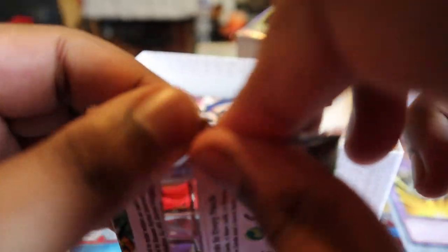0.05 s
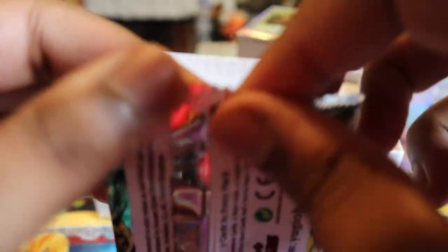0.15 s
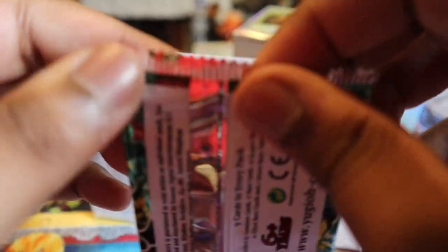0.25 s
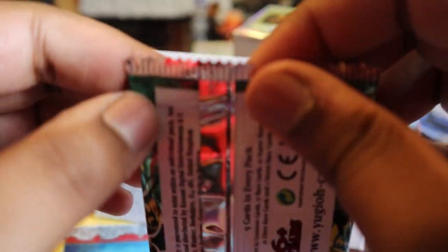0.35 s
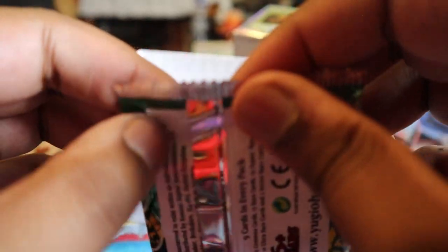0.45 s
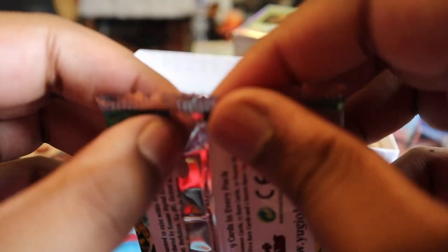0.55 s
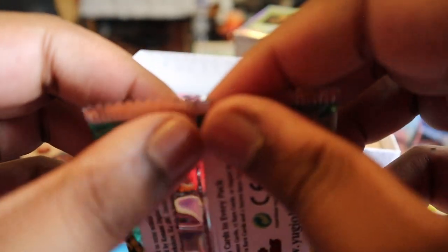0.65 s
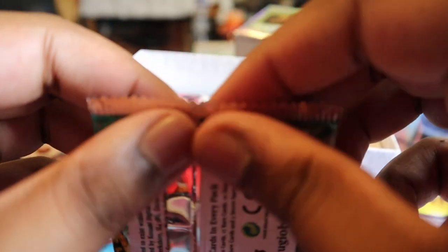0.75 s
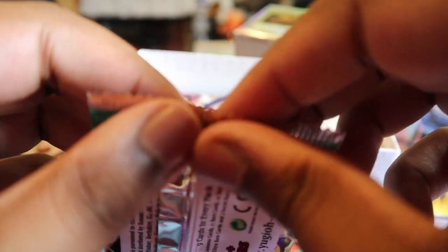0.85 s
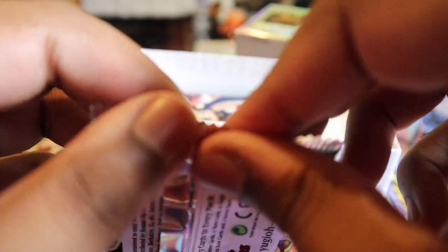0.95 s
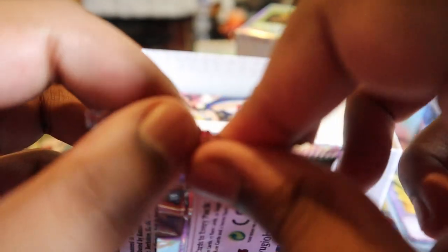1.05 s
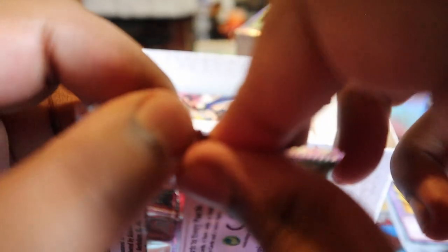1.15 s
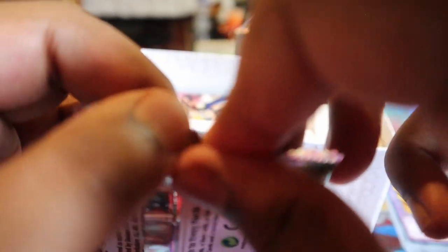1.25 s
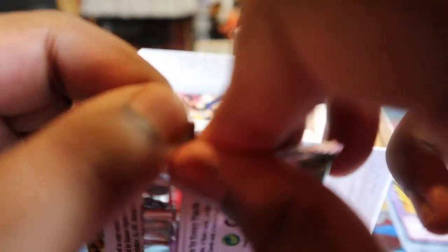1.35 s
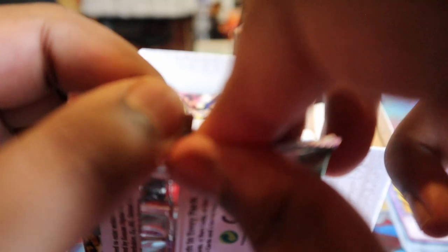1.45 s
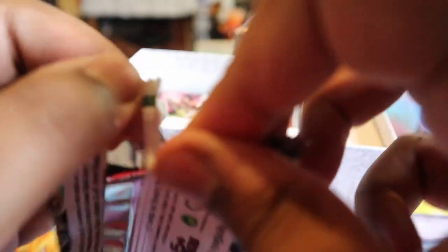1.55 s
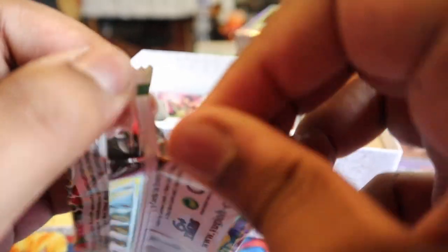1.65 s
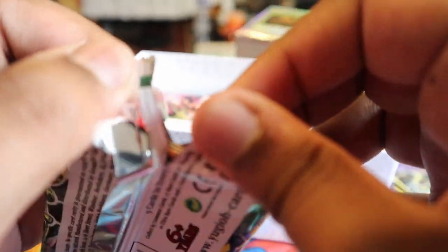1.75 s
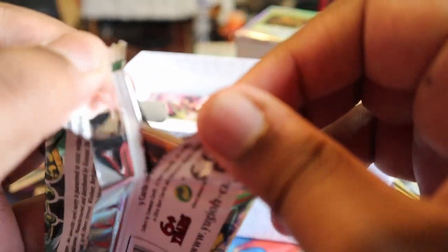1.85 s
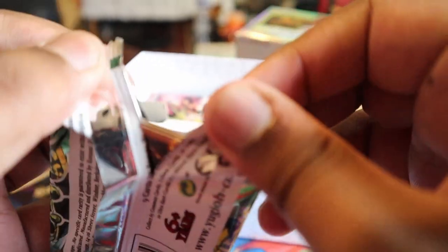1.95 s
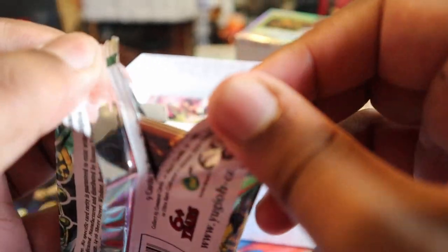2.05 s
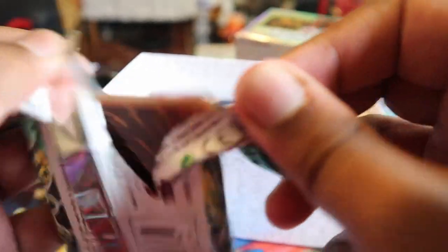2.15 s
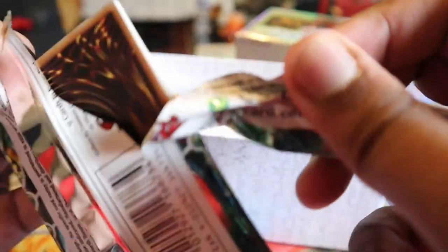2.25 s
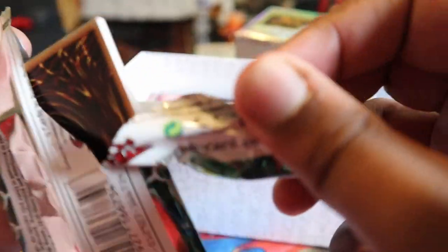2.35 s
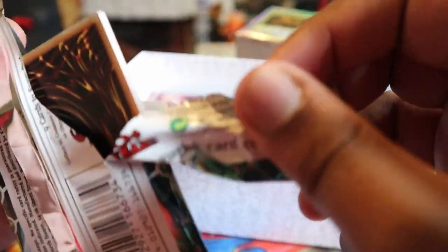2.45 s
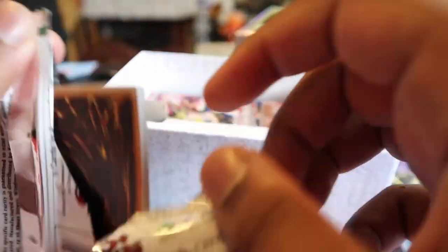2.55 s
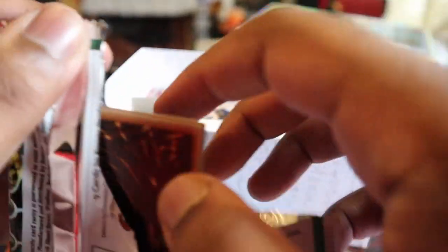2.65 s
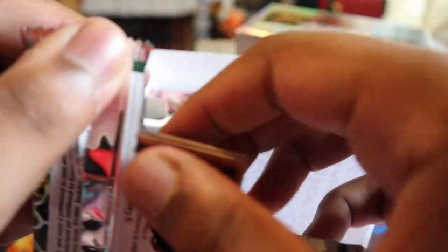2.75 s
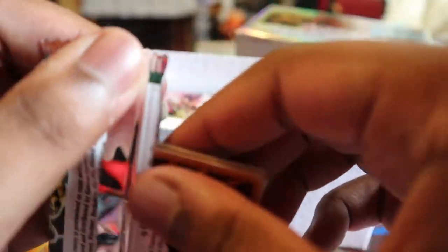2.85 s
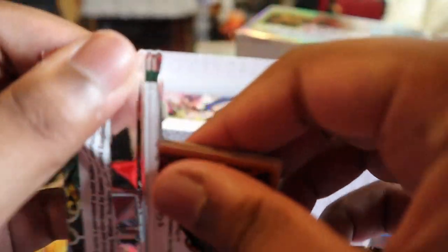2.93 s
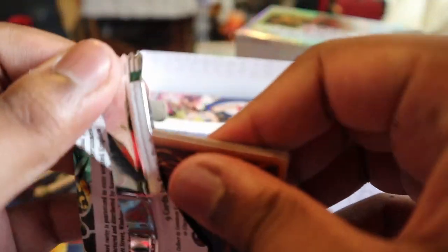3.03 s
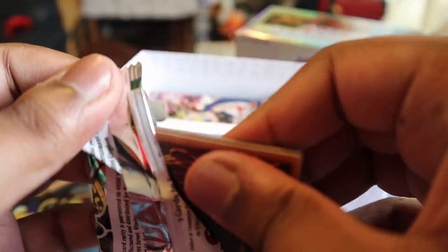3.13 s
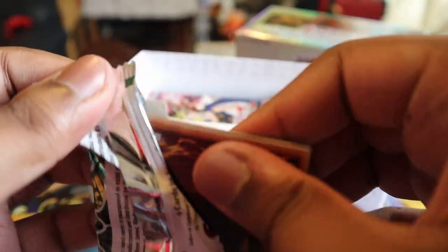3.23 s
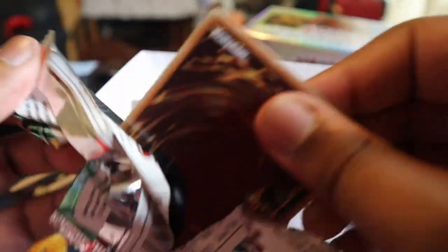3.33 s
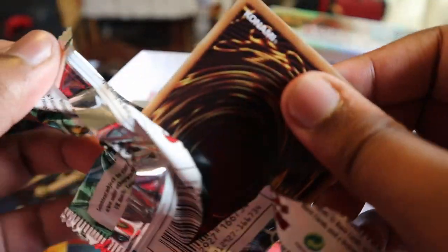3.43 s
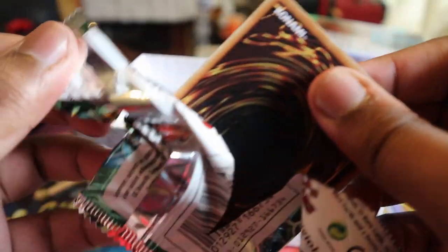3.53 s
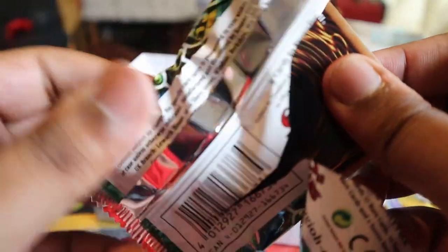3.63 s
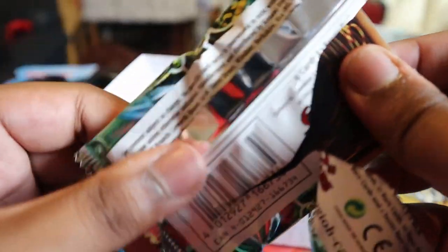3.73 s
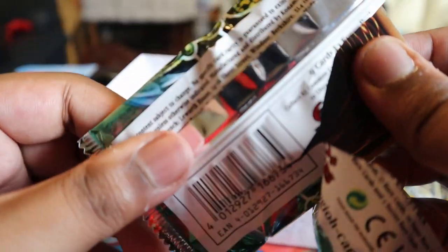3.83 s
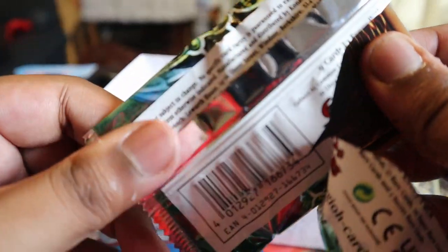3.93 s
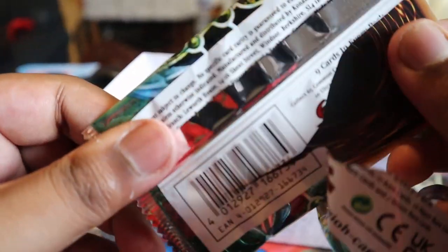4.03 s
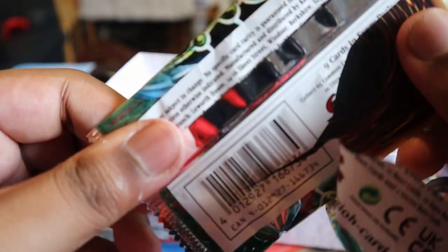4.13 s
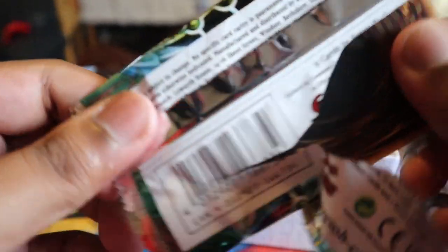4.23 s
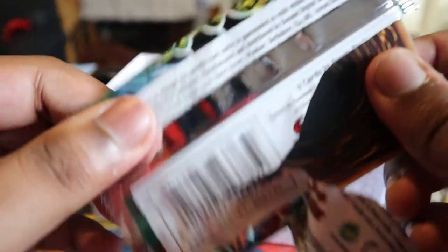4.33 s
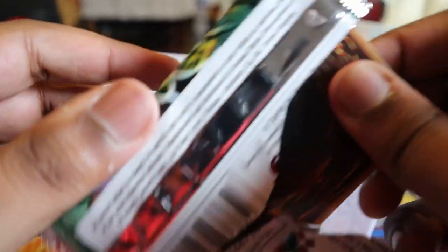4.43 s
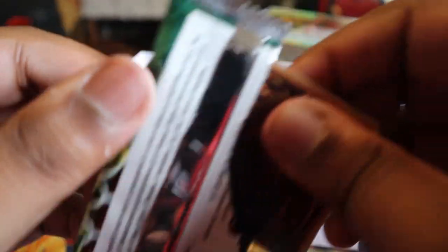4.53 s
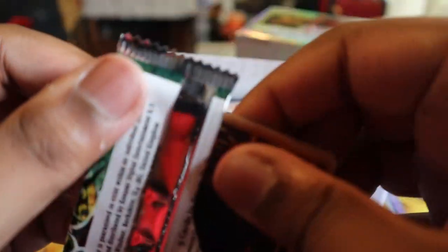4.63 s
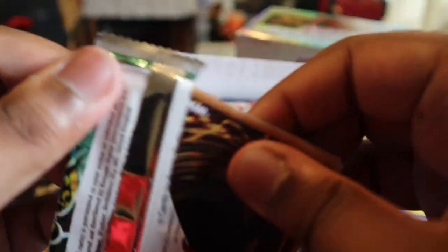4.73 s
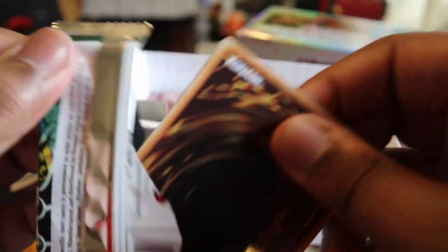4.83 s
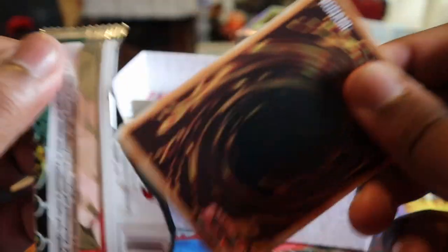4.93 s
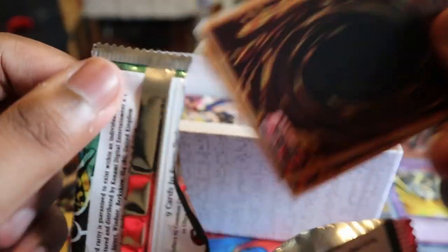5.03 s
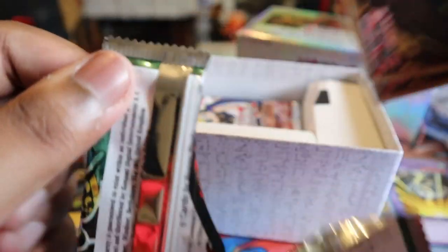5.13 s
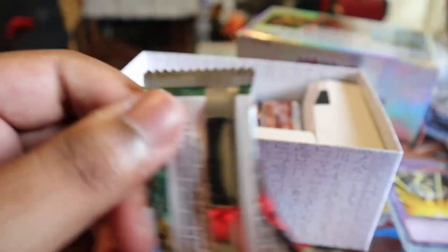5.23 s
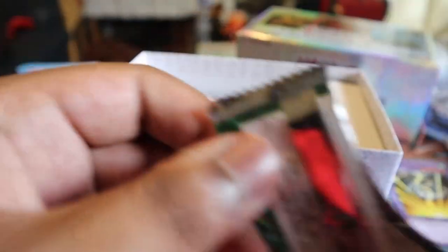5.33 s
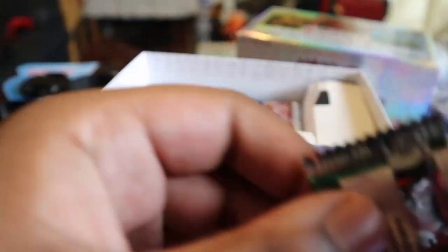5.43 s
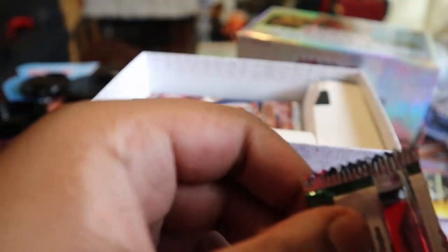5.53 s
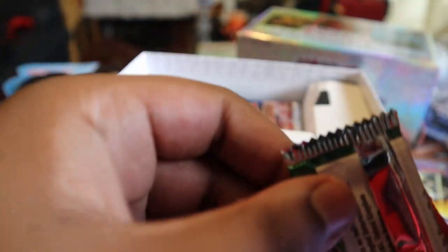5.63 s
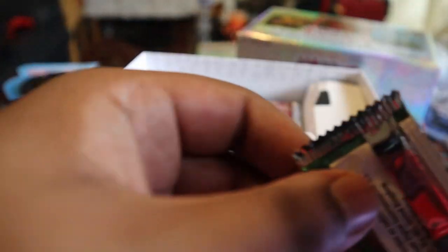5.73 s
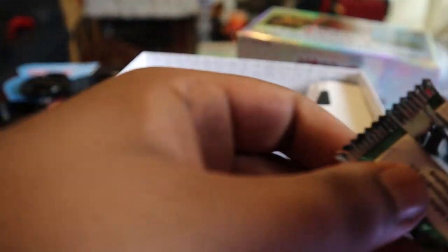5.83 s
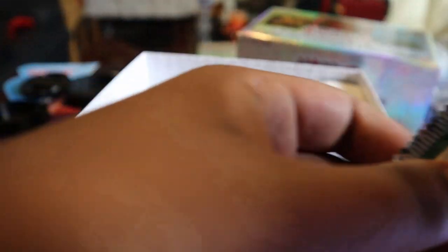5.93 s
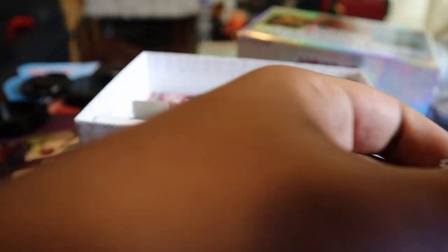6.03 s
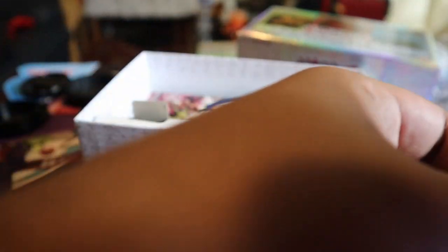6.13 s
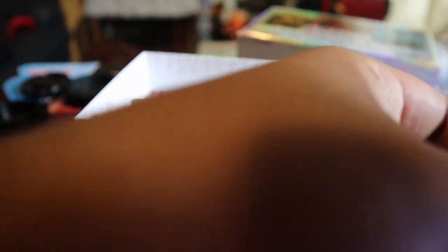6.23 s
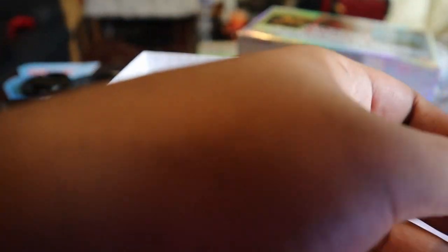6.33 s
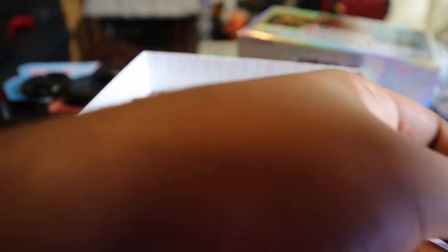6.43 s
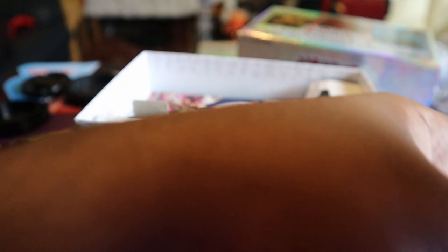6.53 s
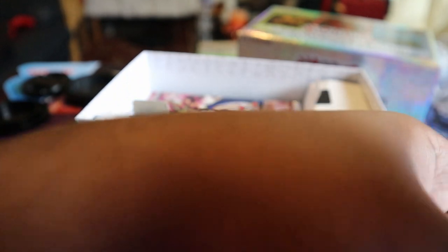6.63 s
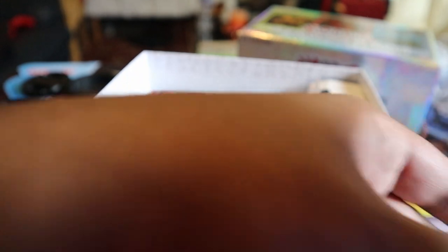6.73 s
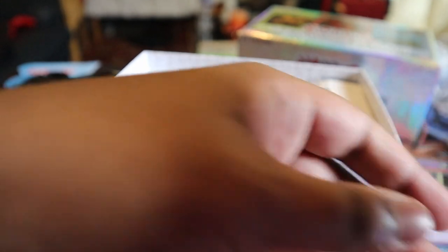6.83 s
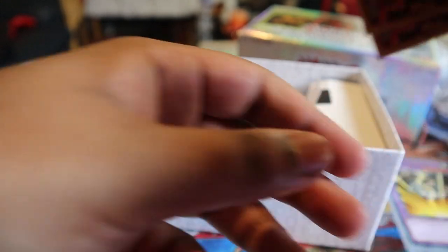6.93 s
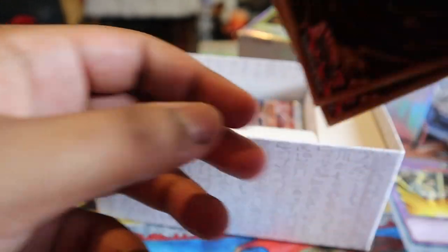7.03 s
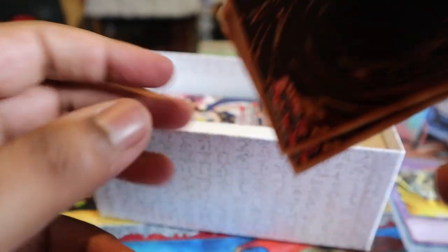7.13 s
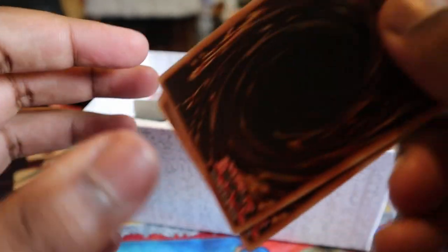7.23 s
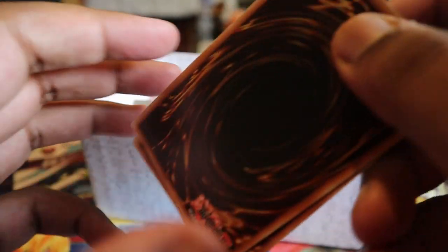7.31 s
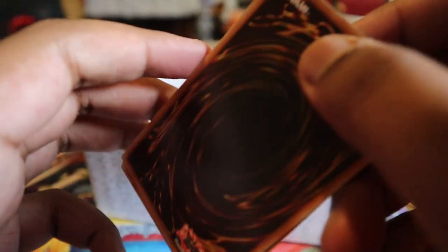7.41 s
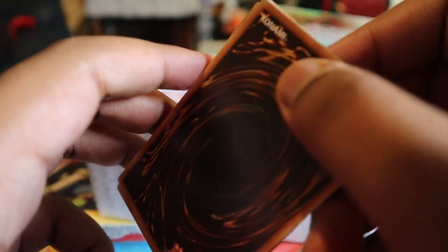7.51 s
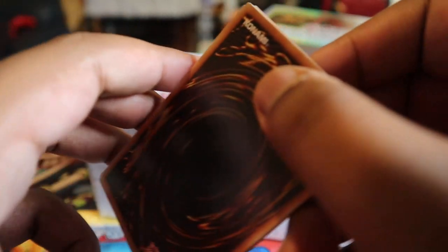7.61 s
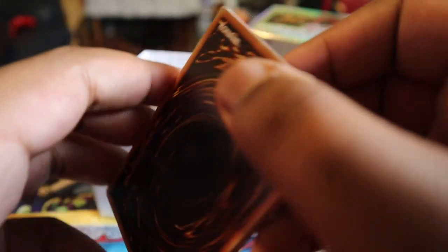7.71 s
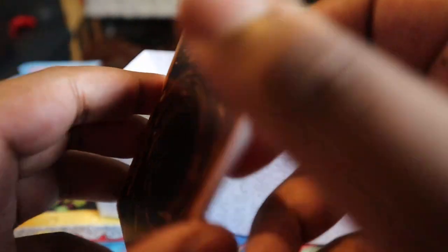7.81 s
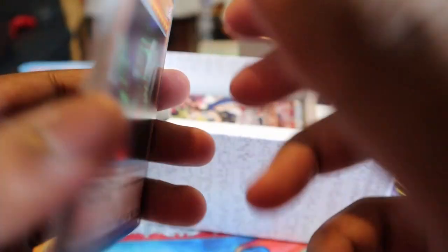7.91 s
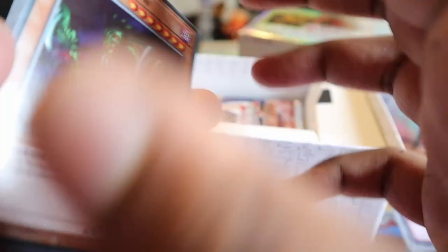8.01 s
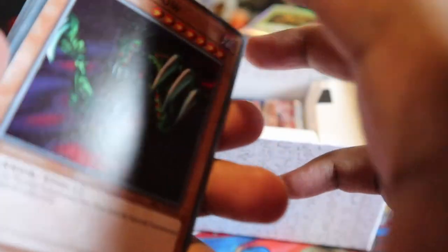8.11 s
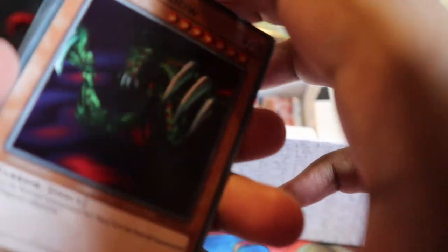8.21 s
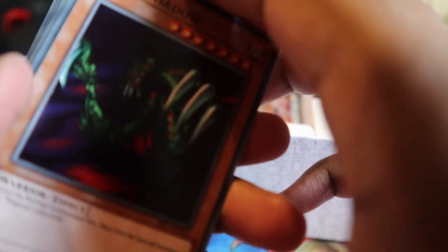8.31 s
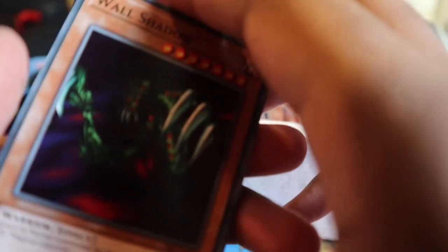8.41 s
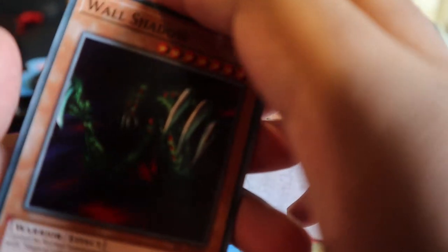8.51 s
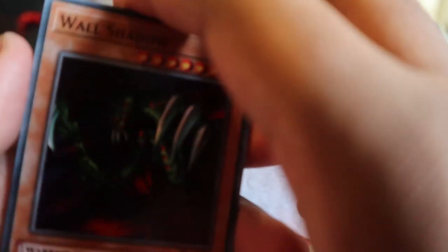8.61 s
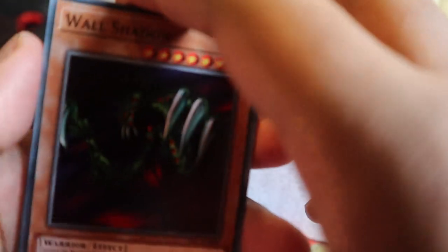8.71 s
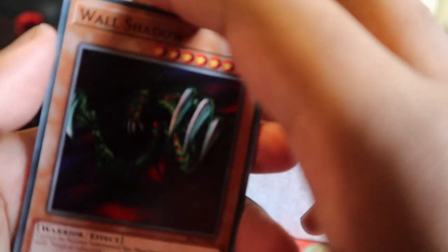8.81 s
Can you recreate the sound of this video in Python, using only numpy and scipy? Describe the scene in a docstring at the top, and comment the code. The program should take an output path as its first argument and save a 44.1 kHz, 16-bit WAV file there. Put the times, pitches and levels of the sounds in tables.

```python
"""A foil wrapper is torn and crumpled close to a small microphone, with single snaps and dense crackling runs.
Each snap is a short burst of noise plus a ringing tone; a rustle of tiny creases follows the handling.
Fingers sliding on cards hiss as shaped noise. Things set on the table thud as sagging tones with rough
knocks, and the stand sways with low noise. A quiet room answers the foil over faint steady noise."""
import sys
import numpy as np
from scipy import signal
from scipy.fft import rfft, irfft, next_fast_len
from scipy.io import wavfile
from scipy.ndimage import uniform_filter1d, map_coordinates

SR = 44100
rng = np.random.default_rng(int(sys.argv[2]) if len(sys.argv) > 2 else 0)


def file_out(sig):
    """Save sig as 16-bit WAV at sys.argv[1]."""
    # one column per channel
    cols = np.atleast_2d(sig).T
    # limit, then scale
    lim = np.clip(cols, -1, 1)
    pcm = np.round(lim * 32767).astype(np.int16)
    wavfile.write(sys.argv[1], SR, pcm)


N = 390726

# The clearest creases; the levels come before each layer's own gain:
# start_s [s], level_db [dB], pitch_hz [Hz], body_db [dB beside level_db], fizz_db [dB beside level_db]
CREASES = [(0.037, -41, 4800, -15, -18), (0.1079, -50, 3290, -13, -10), (0.1474, -10, 3600, -24, -17),
           (0.265, -16.5, 3890, -24, -15), (0.3119, -15, 4930, -23.5, -22),
           (0.3786, -17.5, 6400, -29.5, -19.5), (0.4545, -23, 3730, -18, -19),
           (0.5516, -22, 3480, -27, -25), (0.5795, -14.5, 3600, -27, -24), (0.599, -20, 5770, -28, -14.5),
           (0.7112, -23, 3530, -37, -15), (0.72, -15, 3760, -31, -24), (0.8552, -31.5, 3530, -30, -19),
           (0.8839, -18.5, 3750, -22, -16), (0.9323, -41, 2070, -7, -25), (1.0251, -23, 6100, -51, -12),
           (1.188, -36, 5160, -20, -10), (1.207, -37, 5180, -33, -9), (1.2516, -27, 5000, -38, -13),
           (1.263, -20, 5280, -28, -20), (1.292, -34, 5210, -22, -20), (1.3002, -35, 3600, -16, -19),
           (1.345, -10.5, 3600, -21.5, -15), (1.3892, -19.5, 3740, -20, -21),
           (1.5731, -19.5, 3690, -20, -23), (1.5882, -13, 5510, -21, -13), (1.5982, -16, 3610, -14.5, -19),
           (1.613, -19.5, 4570, -32, -30), (1.6244, -12, 3350, -38, -23), (1.6317, -9, 5630, -37, -18),
           (1.6394, -9, 3670, -28, -18), (1.657, -12, 3510, -26, -38), (1.6669, -23, 3390, -21, -28),
           (1.69, -26, 3760, -23, -31), (1.704, -32, 3720, -31, -25), (1.7448, -17.5, 6100, -49, -13),
           (1.7548, -25.5, 4700, -41, -8), (1.763, -22, 3270, -38, -20), (1.8003, -46, 3520, -14, 7.5),
           (1.8107, -11, 3570, -30, -8.5), (1.8166, -14.5, 3850, -26, -30), (1.8347, -23.5, 5050, -21, -19),
           (1.8582, -25, 4740, -28, -12), (1.8826, -28, 3400, -15, -9.5), (1.8969, -10, 5540, -24.5, -15),
           (1.9071, -2.5, 4750, -32.5, -24), (1.9367, -25, 5150, -28, -14), (1.947, -22, 5450, -18.5, -15),
           (1.977, -19.5, 7130, -50, -6), (2.0396, -30.5, 6390, -42, -10), (2.07, -34, 1970, -12.5, -30),
           (2.1242, -33, 5380, -40, -4), (2.1375, -24.5, 5340, -26, -6.5), (2.1556, -19.5, 5310, -41, -3),
           (2.1745, -9.5, 4700, -31, -6.5), (2.2099, -26, 3520, -41, -17), (2.2221, -8.5, 5000, -37, -16.5),
           (2.2306, -9.5, 6690, -41, -14), (2.2413, -14, 5700, -44, -18.5),
           (2.2493, -7.5, 4960, -43, -21.5), (2.2554, -7, 5010, -37, -20.5), (2.2634, -11, 5100, -38, -17),
           (2.269, -8, 6010, -38, -14), (2.277, -9, 4650, -24, -12), (2.287, -12.5, 3530, -9, -18.5),
           (2.298, -11, 5440, -11, -20), (2.3077, -10.5, 4620, -17.5, -16.5),
           (2.3167, -16.5, 5130, -28, -17), (2.3496, -30, 5470, -15, -24), (2.3651, -27.5, 3290, -15, -28),
           (2.3854, -15.5, 3270, -29, -25), (2.3888, -13, 5020, -24, -16), (2.402, -19, 2190, -17, -13),
           (2.44, -41, 4270, -12, -19), (2.4713, -34, 2550, -35, -27.5), (2.5222, -20, 2560, -25, -17),
           (2.5419, -12.5, 4550, -9, -23), (2.547, -18, 2400, -25, -11.5), (2.5702, 1.5, 3700, -32, -25),
           (2.5806, -28.5, 4070, -14, -31), (2.591, -27.5, 4920, 2.5, -26.5), (2.608, -28, 4870, -10, -36),
           (2.6175, -19.5, 3500, -6.5, -23), (2.6288, -7, 4740, -32, -34), (2.6428, -18, 3560, -15, -26),
           (2.6477, -14.5, 4870, -10, -21), (2.657, -15, 3560, -11, -24), (2.6818, -11.5, 5000, -40, -14),
           (2.6985, -21, 4170, -36, -22), (2.7056, -24.5, 3600, -12.5, -28), (2.768, -45.5, 4900, 3.5, -35),
           (2.9174, -50.5, 3080, -3, -23), (2.9978, -21, 5180, -24.5, -26), (3.011, -35, 3560, -13, -23),
           (3.033, -27.5, 4550, -12, -29), (3.0545, -13.5, 3430, -19, -19.5),
           (3.0802, -27.5, 1980, -15, -27), (3.1058, -34, 6640, -25, -19), (3.1175, -27, 5160, -18.5, -25),
           (3.128, -37, 4810, -31, -14), (3.1662, -29, 3420, -30, -18.5), (3.1761, -11, 4500, -27.5, -22.5),
           (3.1793, -13, 4990, -25, -20), (3.1874, -15.5, 5020, -42, -24), (3.2485, -39, 5080, -14, -10),
           (3.282, -19.5, 3480, -14.5, -20), (3.295, -22.5, 5640, -23, -10), (3.3023, -14, 5500, -21, -6),
           (3.3128, -20, 4880, -28, -9.5), (3.3184, -2, 5290, -41, -26), (3.3258, -10, 3460, -33, -25.5),
           (3.3319, -7, 6480, -26, -11), (3.3373, -8, 5160, -40, -18), (3.3451, -13.5, 3920, -13.5, -20),
           (3.3574, -7, 5040, -40, -21.5), (3.3633, -1.5, 3950, -42, -24.5), (3.3697, -7, 3510, -30, -23.5),
           (3.3752, -9.5, 6460, -42, -10.5), (3.383, -6, 6700, -36, -16.5), (3.396, -10.5, 5370, -20, -14),
           (3.4014, -11, 5170, -30, -12), (3.4098, -1, 5230, -23, -30.5), (3.4188, -16, 4970, -38, -21.5),
           (3.4255, -14.5, 3460, -38, -11), (3.4314, -2, 3360, -52, -18.5),
           (3.4586, -6, 5700, -28.5, -15.5), (3.4815, -16, 4390, -35, -9.5), (3.4874, -4.5, 4890, -42, -26),
           (3.5124, -38, 3190, -17, -16), (3.528, -31, 4920, -33, -8), (3.5447, -21.5, 5830, -25, -23),
           (3.5508, -11.5, 5800, -21, -19), (3.5912, -41, 6200, -14, -1), (3.618, -20, 2160, -14, -23),
           (3.635, -19.5, 5040, -14, -16), (3.6405, -9, 4310, -23.5, -11), (3.6506, -13.5, 4040, -11, -9),
           (3.6619, -10, 3350, -9, -12.5), (3.6686, -12, 5300, -24, -26), (3.6749, -17.5, 5330, -12, -22),
           (3.6857, -11, 4720, -22, -25), (3.712, -22.5, 5030, -22, -12), (3.722, -12, 5260, -18, -12.5),
           (3.739, -5.5, 5380, -31, -18), (3.742, -13.5, 5300, -17.5, -25), (3.802, -13, 4480, -26, -10),
           (3.806, -13.5, 3180, -12, -16), (3.8147, -7, 4600, -23, -31), (3.839, -27, 5420, -20, -23.5),
           (3.846, -33, 4600, -7, -17), (3.8681, -20.5, 5210, -23, -31), (3.8801, -18.5, 2860, -18.5, -32),
           (3.915, -35, 4860, -9, -28), (3.953, -35, 4700, -13, -32.5), (3.9878, -38, 4800, -5, -8.5),
           (4.0242, -10, 5850, -28, -12.5), (4.0411, -3, 2670, -19, -19), (4.0542, -23, 5160, -28, -13),
           (4.07, -17.5, 3930, -23, -21.5), (4.0829, -5.5, 3910, -22, -16), (4.0916, -4, 3110, -19, -13.5),
           (4.0952, -13, 5260, -13, -21.5), (4.1045, -17.5, 5120, -35, -15.5),
           (4.1172, -20.5, 5050, -32, -11.5), (4.183, -30.5, 2220, -12, -24), (4.1884, -33, 2470, -16, -25),
           (4.2059, -24.5, 2780, -20, -40), (4.2697, -22, 6300, -11, -15), (4.2898, -12.5, 2830, -24, -22),
           (4.305, -25, 3010, -27, -27), (4.3385, -26.5, 2160, -20, -37.5), (4.3618, -27, 2380, -11, -34),
           (4.3784, -18.5, 5000, -17, -22), (4.3882, -26, 5060, -22, -6), (4.403, -23, 3690, -13, -29),
           (4.4113, -29, 4870, -14, -11), (4.4228, -21, 5410, -13, -8.5), (4.4454, -6.5, 5990, -17, -16),
           (4.4524, -14.5, 5240, -22, -26), (4.4722, -21.5, 1930, -14, -17), (4.5406, -43, 3870, -2, -11),
           (4.6139, -26, 5460, -12, -7.5), (4.6709, -38, 3460, -6, -16), (4.6817, -19, 5280, -18, -27),
           (4.6924, -19.5, 3240, -19.5, -24), (4.727, -38.5, 3500, -14, -28), (4.7985, -27.5, 4810, -18, 4),
           (4.8219, -33.5, 4870, -14, 5), (4.8445, -32, 4760, -13, -15), (4.8563, -29.5, 3450, -10, -11),
           (4.8653, -16, 5010, -8, -16), (4.881, -18, 2160, -17, -42), (4.8862, -35, 3680, -6, -26),
           (4.9072, -20.5, 2110, -10.5, -23), (4.9342, -20.5, 4770, -13, -21),
           (4.9605, -11, 4940, -26, -30), (4.9823, -32, 3580, -19, -25.5), (5.0315, -31, 3640, -16, -27),
           (5.0504, -35, 3700, -1.5, -28.5), (5.0575, -22, 2180, -15, -27), (5.0709, -19, 3350, -16, -26),
           (5.0806, -9.5, 3570, -22, -18.5), (5.0866, -24, 3490, -5, -25), (5.109, -33, 3800, -5, -15),
           (5.2794, -32, 6010, -11.5, -16), (5.3129, -42, 3470, -7, -21), (5.442, -38.5, 2860, -12, -20.5),
           (5.4631, -29.5, 3380, -5.5, -27), (5.478, -26.5, 3490, -15, -31),
           (5.4944, -20.5, 2730, -20, -28), (5.51, -37, 3540, -12, -14), (5.5443, -22, 3780, -13, -20),
           (5.5643, -23.5, 3770, -14, -26), (5.5796, -23.5, 3250, -11, -30),
           (5.6033, -21.5, 3610, -15.5, -34), (5.6557, -34.5, 2780, -11.5, -28),
           (5.6825, -35.5, 4120, -21, -17), (5.7956, -31.5, 3340, -24, -27.5),
           (5.9524, -26.5, 3820, -16, -30.5), (6.0668, -52.5, 1910, 1, -27),
           (6.1076, -44.5, 2150, -14, -34), (6.1569, -42, 1900, 3, -39), (6.166, -36.5, 3480, -8, -32),
           (6.2455, -34, 3360, -15, -18.5), (6.3594, -57, 2390, 2, -17), (6.6181, -22.5, 3330, -17.5, -20),
           (6.6286, -34.5, 3830, -8, -20), (6.664, -30, 5200, -10.5, -20), (6.734, -35.5, 1930, -5, -31),
           (6.747, -22.5, 3800, -20.5, -26), (6.773, -38, 2160, -16, -29), (6.785, -36.5, 2100, -4.5, -21),
           (6.8377, -23.5, 2080, -8.5, -29), (6.8578, -38, 2230, -0.5, -29), (6.9471, -54, 2430, -1, -24),
           (7.1724, -49.5, 2330, 3, -23), (7.765, -48, 3690, -16, -15)]
# Colour of the crackling foil: pitch_hz [Hz], relative_level_db [dB per Hz]
FOIL_COLOUR = [(880, -49), (1500, -17.5), (1790, -10.5), (2270, -6), (3000, -5.5), (3530, 0.5),
               (4410, -4.5), (5150, -2.5), (5720, -3.5), (8000, -17.5), (10400, -36), (17600, -120)]
# Colour of the high, fizzing edges: pitch_hz [Hz], relative_level_db [dB per Hz]
FIZZ_COLOUR = [(1500, -86.5), (5000, -14.5), (7500, -5.5), (11000, -7.5), (15500, -12.5), (16500, -35)]
# Colour of the packet as a whole: pitch_hz [Hz], relative_level_db [dB per Hz]
BODY_COLOUR = [(200, -18.5), (420, -11), (620, -7), (900, -1), (1500, -6.5), (2200, -16.5), (6000, -86.5)]

CONTROL_STEP = 64  # samples between the points of a slow control


def handling():
    """Handling level in dB: every grip and every snap sets the foil moving, and it settles."""
    # Pulls and squeezes on the foil: start_s [s], hold_s [s], level_db [dB, of the handling]
    grips = [(0.033, 0.033, -76), (0.103, 0.009, -65), (0.256, 0.073, -47.5), (.92, .03, -53.5),
             (1.04, 0.0072, -56), (1.185, 0.034, -51), (1.595, 0.061, -33.5), (1.748, 0.36, -56.5),
             (1.953, 0.087, -57), (2.154, 0.037, -43.5), (2.223, 0.082, -22), (2.383, 0.013, -41),
             (2.59, .05, -56), (2.653, 0.059, -44), (2.984, .15, -49.5), (3.176, 0.0057, -33.5),
             (3.34, 0.082, -23.5), (3.657, 0.01, -22), (3.719, .02, -37.5), (3.809, 0.0044, -34),
             (4.032, 0.011, -40.5), (4.087, 0.0035, -18), (4.289, 0.055, -48.5), (4.438, 0.0094, -43),
             (4.547, 0.0095, -46.5), (4.671, 0.025, -47.5), (4.78, 0.12, -43), (4.956, 0.1, -39.5),
             (5.073, 0.0084, -23.5), (5.298, 0.034, -59), (5.483, 0.09, -46.5), (5.545, 0.052, -57),
             (5.668, 0.018, -58), (5.935, 0.033, -60.5), (6.162, .015, -63), (6.24, 0.0089, -52),
             (6.604, 0.033, -58), (6.756, 0.13, -54.5)]
    rise, fall = 760, 690  # dB a second
    settle_db, settle_fall = -33, 100  # a lower, slower part of each grip: dB, dB a second
    after_db, after_fall = -34.5, 213  # motion left by a snap: dB beside the snap, dB a second

    start_s, hold_s, level_db = np.transpose(grips)
    settling = amp(settle_db) * stroke(start_s, hold_s, rise, settle_fall)
    grip = stroke(start_s, hold_s, rise, fall) + settling
    snap_s, snap_db = np.transpose(CREASES)[:2]
    after = stroke(snap_s, 0 * snap_s, 1e4, after_fall)
    grip_power = amp(2 * level_db) @ grip ** 2
    after_power = amp(2 * (snap_db + after_db)) @ after ** 2
    return spread(10 * np.log10(grip_power + after_power + 1e-12))


def snaps(creases):
    """A crease buckles in a burst of a few ms: a facet rings, the packet booms, the edge fizzes."""
    start_s, level_db, pitch_hz, body_db, fizz_db = np.transpose(creases)
    t = np.arange(600) / SR
    draw = rng.standard_normal((len(start_s), len(t) + 1))
    life_scatter = np.exp(draw[:, :1] / 8)
    onset = 1 - np.exp(-t / 0.00078)

    def fade(t60_s):
        """A quick start, then a fall of 60 dB in about t60_s."""
        return amp(-60 * t / (t60_s * life_scatter)) * onset

    buckle = draw[:, 1:] / np.std(draw[:, 10:90], axis=1, keepdims=True)
    crack = 1 + 1.1 * amp(-60 * (t - .0005) ** 2 / 0.00029 ** 2)  # extra strength around 0.5 ms
    burst = buckle * crack * amp(level_db)[:, None]

    ring = np.sin(2 * np.pi * pitch_hz[:, None] * t)
    facet = amp(level_db + 2.0)[:, None] * fade(0.0057) * ring
    body_burst = burst * amp(body_db)[:, None] * fade(0.017)
    fizz_burst = burst * amp(fizz_db)[:, None] * fade(0.008)
    foil = amp(-4.0) * coloured(place(start_s, burst * fade(0.0077)), FOIL_COLOUR)
    body = amp(2.5) * coloured(place(start_s, body_burst), BODY_COLOUR)
    fizz = amp(5.5) * coloured(place(start_s, fizz_burst), FIZZ_COLOUR)
    return place(start_s, facet) + foil + body + fizz


def lesser_creases(handling_db):
    """Creases at chance moments follow the strength of the handling, each with its own colour."""
    per_second, over_handling_db, level_scatter_db = 110, 3.5, 5
    middle_hz, middle_body_db, middle_fizz_db, colour_scatter_db = 3780, -21, -15.5, 3.5

    count = int(per_second * N / SR)
    start_s = rng.random(count) * (N - 1) / SR
    draw = rng.standard_normal((count, 4))
    level_db = handling_db[(start_s * SR).astype(int)] + over_handling_db + level_scatter_db * draw[:, 0]
    pitch_hz = np.clip(middle_hz * np.exp(0.23 * draw[:, 1]), 1800, 7000)
    body_db = middle_body_db + colour_scatter_db * draw[:, 2]
    fizz_db = middle_fizz_db + colour_scatter_db * draw[:, 3]
    return np.transpose([start_s, level_db, pitch_hz, body_db, fizz_db])


def rustle(handling_db):
    """Swarms of tiny creases over a hiss; harder handling brings more of the swarms forward."""
    # Colour of the rustle as the packet turns, fizz before a further -4 dB:
    # time_s [s], fizz_db [dB], body_db [dB]
    turning = [(0, 1.5, -9), (.8, -4, -12), (.95, -2, -6.5), (1.3, -2.5, -11.5), (2.3, 2.5, -12),
               (2.6, -14, -6), (2.8, -9, -2), (3.2, 0, -14.5), (3.9, -4, -11.5), (5.1, -13.5, -7),
               (5.5, -14, -1.5), (7, -10.5, -2)]

    chance, size = rng.random((2, N))
    ticks = (chance < 500 / SR) * amp(-4 * np.log(size + 1e-9))  # about 500 a second, a few very strong
    swarm = signal.lfilter([1], [1, -np.exp(-1 / (SR * .0009))], ticks)  # each dies away over 0.9 ms
    grainy = np.clip((handling_db + 74.5) / 40, .05, .8)  # share of the swarms in the power
    hiss = amp(2.5 * wobble(60))
    strength = np.sqrt(grainy) * unit(swarm) + np.sqrt(1 - grainy) * hiss
    drive = strength * rng.standard_normal(N)
    foil = patchy(amp(handling_db - 8.5) * drive, 3)  # colour shifts by about 3 dB as the folds change
    fizz_db, body_db = curves(turning)
    fizz = amp(fizz_db - 4.0) * coloured(foil, FIZZ_COLOUR)
    body = amp(body_db) * coloured(foil, BODY_COLOUR)
    return coloured(foil, FOIL_COLOUR) + fizz + body


def patchy(x, depth_db):
    """Gives x patches of random gain, some 700 Hz by 50 ms."""
    z = signal.stft(x, nperseg=256)[2]
    field = uniform_filter1d(rng.standard_normal(z.shape), size=4, axis=0)  # smooth over pitch
    field = uniform_filter1d(field, size=17, axis=1)  # smooth over time
    return signal.istft(z * amp(depth_db * unit(field)), nperseg=256)[1][:N]


def rubs():
    """Skin on smooth card hisses, only while the fingers slide; a duller stroke has more body."""
    # Fingers sliding on cards: start_s [s], hold_s [s], level_db [dB], fizz_db [dB beside level_db]
    slides = [(6.92, 0.382, -71, -33.5), (7.463, 0.036, -69, -5), (7.538, .2, -66.5, -5),
              (7.91, 0.0069, -78, 5.5), (8.097, 0.051, -86.5, -12), (8.297, 0.03, -64.5, -9.5),
              (8.425, 0.031, -61.5, -11)]
    rise, fall = 1500, 510  # dB a second

    start_s, hold_s, level_db, fizz_db = np.transpose(slides)
    slide = stroke(start_s, hold_s, rise, fall)
    skin = amp(1.5 * wobble(60)) * rng.standard_normal(N)

    def layer(layer_db, colour):
        """The same skin noise in one colour."""
        return coloured(skin * spread(amp(layer_db) @ slide), colour)

    body_db = level_db - 17 - .6 * fizz_db  # 0.6 dB more body for each dB less fizz
    return layer(level_db, FOIL_COLOUR) + layer(level_db + fizz_db, FIZZ_COLOUR) + layer(body_db, BODY_COLOUR)


def table():
    """Soft blows knock roughly, ring the top at a pitch that sags and set the stand rocking."""
    # Hands on the table; the tone starts near 1.44 times base_hz and sags to half of it:
    # start_s [s], level_db [dB], base_hz [Hz], knock_db [dB beside level_db]
    thuds = [(1.363, -33.5, 66, -20), (2.277, -39, 43, 0), (2.308, -35, 67.3, -10),
             (2.567, -42.5, 94, -0.5), (2.659, -43.5, 106.4, 1.5), (3.397, -44, 41.5, 0.5),
             (3.66, -27, 167.4, -3.5), (3.683, -29, 199, -6), (3.741, -32.5, 113, -2.5),
             (4.075, -39, 40.4, 7), (4.108, -47.5, 94.2, 6), (4.867, -37, 45.8, -10), (5.078, -41.5, 57, 4),
             (5.346, -43.5, 133.7, 7), (5.944, -31, 95, -8.5), (6.76, -45, 121.6, -2),
             (7.182, -35.5, 60.1, -10.5), (7.498, -48.5, 41.1, -2), (8.327, -48, 42.9, -14),
             (8.717, -52, 43, -0.5)]
    # Colour of the rough knock: pitch_hz [Hz], relative_level_db [dB per Hz]
    knock_colour = [(40, -19), (120, 2), (300, -11), (700, -28), (1500, -50), (4000, -100)]
    # Colour of the swaying stand: pitch_hz [Hz], relative_level_db [dB per Hz]
    sway_colour = [(8, -20), (15, -2), (20, 0), (27, -10), (38, -45), (70, -140)]
    rock_hz, rock_db, rock_t60_s = 19, -12.5, 1.7  # rock_db is beside a blow of base 60 Hz
    rock_slope_db = 8  # less rocking for each octave away from 60 Hz

    start_s, level_db, base_hz, knock_db = np.transpose(thuds)
    t = np.arange(SR * 2 // 3) / SR
    turns = base_hz[:, None] * (0.5 * t + .75 * .04 * (1 - np.exp(-t / 0.032)))
    t60_s = 15 / base_hz[:, None]  # deeper blows last longer
    onset = 1 - np.exp(-t / 0.013)
    blows = amp(level_db[:, None] - 60 * t / t60_s) * onset * np.sin(2 * np.pi * turns)
    uneven = uniform_filter1d(rng.standard_normal(blows.shape), size=400, axis=1)
    blows = blows * amp(3 * unit(uneven))

    soft = 1 - np.exp(-t / 0.004)
    knock_fade = amp((level_db + knock_db)[:, None] - 60 * t / 0.08)
    rough = knock_fade * soft * rng.standard_normal(blows.shape)

    push_db = level_db + rock_db - rock_slope_db * np.abs(np.log2(base_hz / 60))
    ease = np.sin(np.pi * t / t[-1]) ** .3  # silent at both ends
    rocks = amp(push_db[:, None] - 60 * t / rock_t60_s) * ease * np.sin(2 * np.pi * rock_hz * t)
    sway = amp(-61 + 3.0 * wobble(3)) * noise(sway_colour)  # the stand never rests
    return place(start_s, blows + rocks) + coloured(place(start_s, rough), knock_colour) + sway


def room(x):
    """The walls answer with noise tails, each pitch dying at its own speed; every 1/4 s has a new tail."""
    # How long the echo takes to fall 60 dB: pitch_hz [Hz], t60_s [s]
    walls = [(300, 0.17), (2000, 0.18), (5000, 0.069), (14000, 0.13)]

    out, step = np.zeros(N + SR), SR // 4
    for a in range(0, N, step):
        hz, t, z = signal.stft(rng.standard_normal(SR // 3), SR, nperseg=256)
        fade = amp(-60 * t / along(walls, hz)[:, None])
        tail = signal.istft(z * fade, SR, nperseg=256)[1]
        wet = signal.fftconvolve(x[a:a + step], tail / np.linalg.norm(tail))
        out[a + 150:][:len(wet)] += wet  # the echo starts 150 samples late
    return out[:N]


def background_air():
    """Room and microphone noise: coloured noise whose level drifts slowly around -64 dB."""
    # Its colour: pitch_hz [Hz], relative_level_db [dB per Hz]
    air_colour = [(30, -30.5), (45, -9.5), (80, -21.5), (120, -13.5), (170, -23), (400, -27), (800, -30.5),
                  (1400, -34.5), (2500, -37), (6000, -42), (15000, -49), (16500, -55)]
    drift = amp(wobble(3))
    return amp(-64) * drift * noise(air_colour)


def amp(db):
    """Turns dB into a plain gain."""
    return 10 ** (np.asarray(db) / 20)


def unit(x):
    """Scales x to an rms of 1."""
    return x / np.sqrt(np.mean(x ** 2) + 1e-20)


def along(points, hz):
    """Reads a curve of (Hz, value) points on a log pitch axis."""
    f, v = np.transpose(points)
    return np.interp(np.log(hz + 1), np.log(f + 1), v)


def curves(rows):
    """One value per sample for each column after the time."""
    time_s, *columns = np.transpose(rows)
    return [np.interp(np.arange(N) / SR, time_s, column) for column in columns]


def wobble(rate):
    """A smooth random curve through `rate` random points a second."""
    return map_coordinates(rng.standard_normal(int(N * rate / SR) + 4), [np.arange(N) * rate / SR])


def noise(colour):
    """Steady noise of rms 1 with that colour."""
    m = next_fast_len(N)
    gain = amp(along(colour, np.fft.rfftfreq(m, 1 / SR)))
    return unit(irfft(rfft(rng.standard_normal(m)) * gain, m)[:N])


def coloured(x, colour):
    """Filters x to that colour with total energy 1 and no sound ahead of its cause."""
    size = 2048
    gain = amp(along(colour, np.fft.rfftfreq(size, 1 / SR)))
    c = irfft(np.log(gain + 1e-6), size)
    c[1:size // 2] *= 2  # fold the cepstrum forward: minimum phase
    c[size // 2 + 1:] = 0
    h = irfft(np.exp(rfft(c)), size)
    return signal.fftconvolve(x, h / np.linalg.norm(h))[:N]


def place(start_s, rows):
    """Sums short sounds, one a row, at their times."""
    at = np.round(start_s * SR).astype(int)[:, None] + np.arange(rows.shape[1])
    return np.bincount(at.ravel(), rows.ravel(), N + SR)[:N]


def stroke(start_s, hold_s, rise, fall):
    """Gain that climbs to 1 at start_s, holds and falls, slopes in dB a second; one row per stroke."""
    t = np.arange(0, N, CONTROL_STEP) / SR
    climb_db = rise * (t - start_s[:, None])
    drop_db = fall * ((start_s + hold_s)[:, None] - t)
    return amp(np.minimum(0, np.minimum(climb_db, drop_db)))


def spread(slow):
    """Stretches a slow control to one value per sample."""
    return np.interp(np.arange(N), np.arange(len(slow)) * CONTROL_STEP, slow)


def scene():
    """The foil and cards, the room's answer to them, the table and the background."""
    handling_db = handling()
    creases = np.vstack([CREASES, lesser_creases(handling_db)])
    foil = snaps(creases) + rustle(handling_db) + rubs()
    return (foil + amp(-19) * room(foil) + table() + background_air())[None]


def record(dry):
    """The loudest cracks round off in the preamplifier; nothing is kept above the band limit."""
    top_hz = 17000
    loud = dry / (1 + np.abs(dry / .9) ** 4) ** (1 / 4)
    m = next_fast_len(N)
    hz = np.fft.rfftfreq(m, 1 / SR)
    band = np.clip((top_hz - hz) / 900, 0, 1) ** 2  # closes over the last 900 Hz
    return irfft(rfft(loud, m) * band, m)[:, :N]


dry = scene()
out = record(dry)
file_out(out)
```